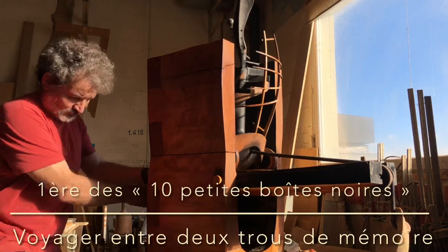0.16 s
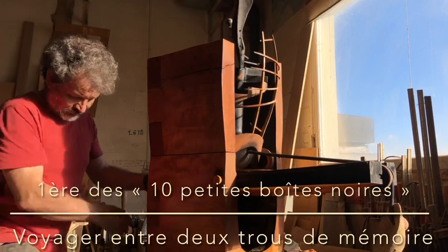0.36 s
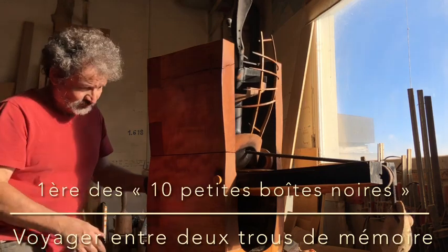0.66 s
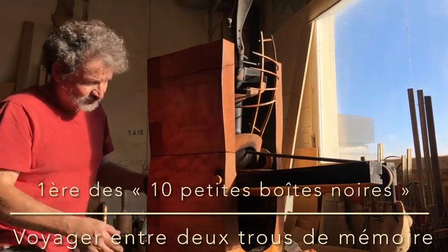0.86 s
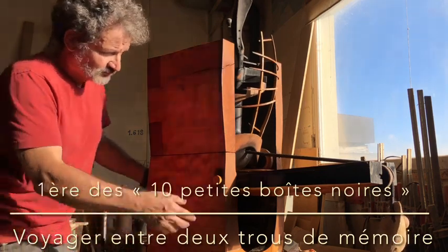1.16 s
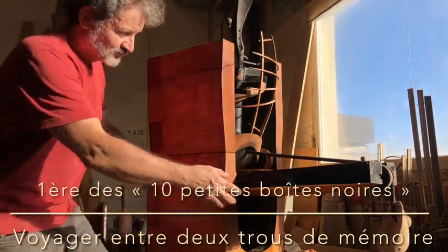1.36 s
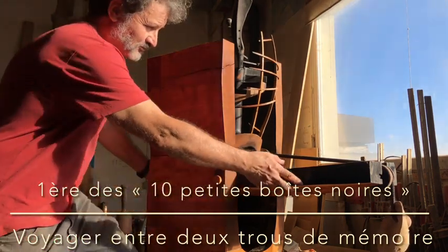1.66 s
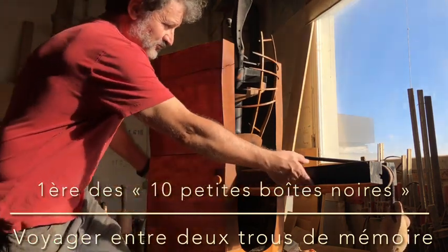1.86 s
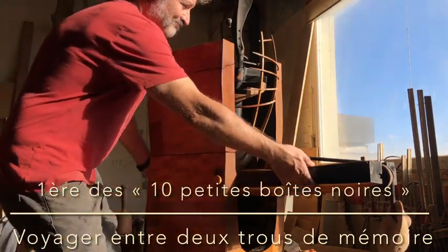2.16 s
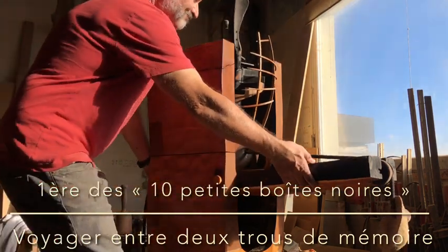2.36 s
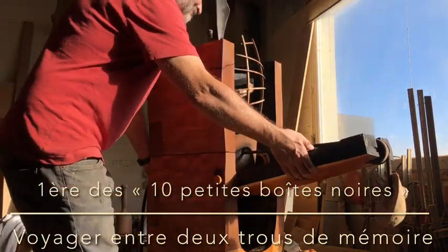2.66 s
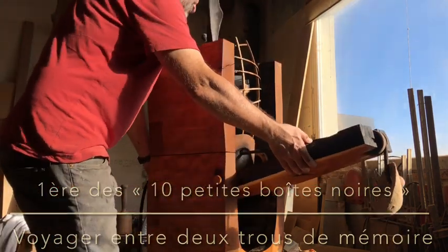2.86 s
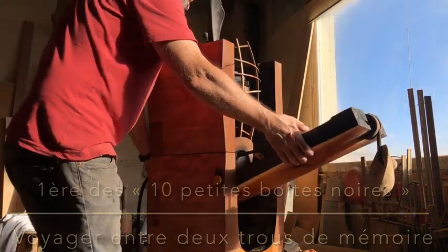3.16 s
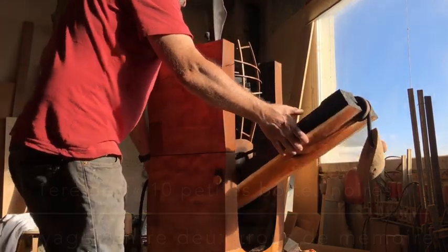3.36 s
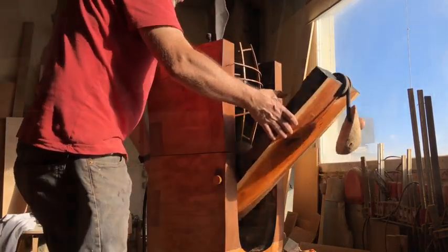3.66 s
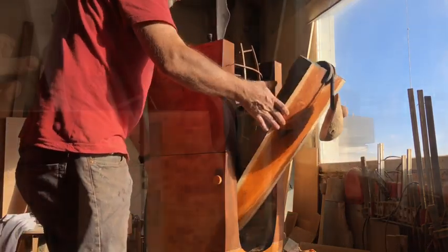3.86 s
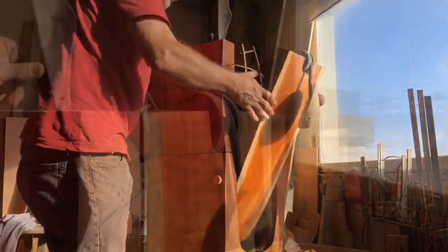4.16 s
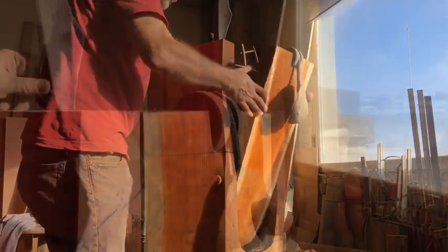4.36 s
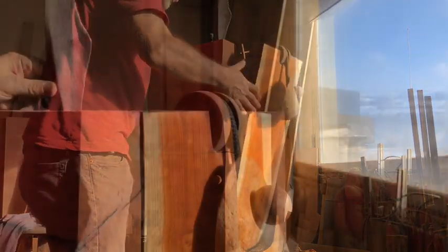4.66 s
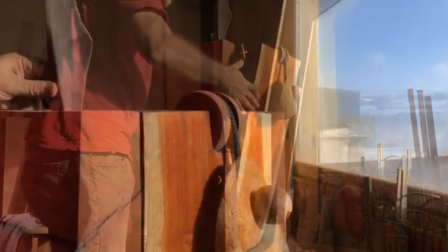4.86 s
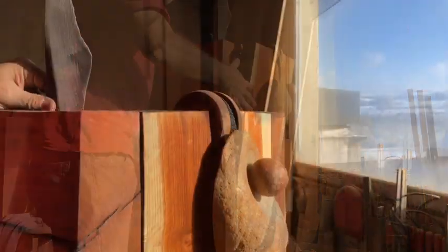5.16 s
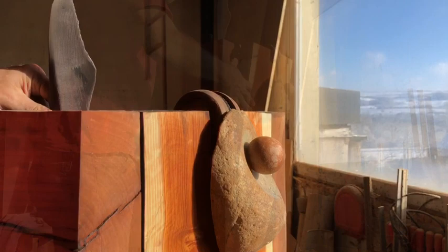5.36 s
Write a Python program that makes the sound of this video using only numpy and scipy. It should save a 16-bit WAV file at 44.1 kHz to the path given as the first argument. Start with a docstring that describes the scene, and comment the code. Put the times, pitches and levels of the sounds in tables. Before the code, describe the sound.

In a small workshop, a wooden drawer scrapes and shuts with a hollow knock. More short slides and knocks follow, then a quick wooden clatter. A hinge creaks and groans briefly as a wooden arm is raised. Near the end come a faint thin squeak, a thud and a slow, juddering rub. Clothes rustle softly, and a microphone a few metres away picks up the room's short echo.

```python
"""A small workshop, one microphone a few metres from a wooden box whose drawers and arm are worked.
Wood scrapes on wood in dense slips and knocks against its stops, setting the parts and bench ringing.
Small catches tick, friction makes the hinge groan as the arm is raised, and near the end come a thin
squeak and a slow, juddering rub. Clothes rustle, and the room rings briefly over a quiet hiss."""
import sys
import numpy as np
from scipy import signal
from scipy.fft import rfft, irfft, next_fast_len
from scipy.io import wavfile
from scipy.ndimage import uniform_filter1d

SR = 44100
rng = np.random.default_rng(int(sys.argv[2]) if len(sys.argv) > 2 else 0)


def file_out(sig):
    """Save sig as 16-bit WAV at sys.argv[1]."""
    # one column per channel
    cols = np.atleast_2d(sig).T
    # limit, then scale
    lim = np.clip(cols, -1, 1)
    pcm = np.round(lim * 32767).astype(np.int16)
    wavfile.write(sys.argv[1], SR, pcm)


N = 243431
TIME = np.arange(N) / SR
RING = TIME[:SR]  # one second holds any ring

# The workshop's echo. Each row: frequency in Hz, seconds to fall 60 dB (t60).
ROOM_T60 = [(80, 1), (210, 0.9), (560, 0.59), (1470, 0.43), (3900, 0.41), (10000, 0.16)]
# Spectra of the room tone and of cloth. Each row: frequency in Hz, relative density in dB.
ROOM_TONE_SPECTRUM = [(15, -66), (25, -6.5), (99, 0.5), (152, -8), (193, 1), (246, -8.5), (399, -27.5),
                      (457, -25.5), (666, -24.5), (782, -22), (1300, -35), (1570, -33), (3930, -36),
                      (15500, -39)]
CLOTH_SPECTRUM = [(410, -39.5), (700, -13), (818, -9.5), (1360, -4), (1580, -5.5), (2130, -8.5),
                  (3450, -9.5), (15500, -17)]
# Movements of the person at the box. Each row: peak in seconds, half length in seconds, swish in dB.
MOVES = [(0.007, 0.1, -72.5), (0.333, 0.274, -69.5), (1.104, 0.315, -69.5), (1.635, .16, -70),
         (2.21, 0.455, -69), (2.953, .25, -79), (3.58, 0.33, -77), (4.32, 0.14, -77), (5.402, 0.44, -74)]
# Resonances of a dry joint and of the hinge. Each row: frequency in Hz, width in Hz, relative dB.
JOINT = [(1117, 160, -0.5), (1343, 96, -4.5), (2140, 200, -13)]
HINGE_CREAK = [(380, 39.4, -14), (589.6, 19.5, -7), (1400, 37, -12.5), (1660, 31, -29), (3180, 36, -20)]
HINGE_DEEP_GROAN = [(192.17, 11, 2.5), (484, 61, -2.5), (556, 37, -8), (1170, 120, -35), (1350, 50, -11.5)]
# Creaks. Each row: start, end, rise and fall in seconds, tone and rasp gains in dB, resonances.
GROANS = [
    (0.181, 0.215, 0.0059, .02, -74, -57, JOINT),
    (2.868, 2.917, .012, 0.012, -52, -54.5, HINGE_CREAK),
    (3.348, 3.384, 0.014, 0.042, -49.5, -56.5, HINGE_DEEP_GROAN),
]
# Sliding strokes. Each row: start, end and rise in seconds, rumble and grit in dB, grit top in Hz.
SLIDES = [ (0.735, 0.761, 0.002, -49, -55, 5180), (0.757, 0.798, 0.0188, -45.5, -61.5, 3600),
          (0.899, 0.998, 0.026, -53, -70.5, 4000), (1.597, 1.696, 0.062, -57, -64, 11500),
          (1.986, 2.037, 0.048, -52.5, -57, 14000), (2.388, 2.407, 0.00266, -40, -50.5, 9100),
          (2.426, 2.463, .0046, -49, -60.5, 10100), (2.968, 2.983, 0.0021, -39, -49, 2720), ]
# Catches and fingernails. Each row: start in seconds, level in dB, centre in Hz.
TICKS = [(0.760, -60.5, 11700), (0.792, -74, 9000), (0.876, -76, 4300), (1.025, -73, 2610),
         (1.043, -70.5, 10500), (1.254, -80, 8700), (2.259, -69, 12500), (2.967, -65, 6000),
         (4.510, -77, 12000), (4.949, -79, 2410)]
# Blows. Each row: start in seconds, part, level in dB, thud centre in Hz, crack in dB against the thud.
KNOCKS = [ (0.791, "drawer", -35.5, 340, -17), (1.718, "panel", -41.5, 510, -9.5),
          (2.047, "runner", -56.5, 336.5, -9), (2.259, "catch", -51.5, 377, -5),
          (2.390, "case", -51.5, 560, -14), (2.419, "case", -45.5, 660, -13),
          (2.434, "case", -41.5, 220, -15.5), (2.453, "case", -37.5, 303, -29.5),
          (2.476, "case", -43, 323, -27), (2.724, "runner", -72.5, 550, -20),
          (2.965, "arm", -46.5, 522, -1), (4.348, "lid", -45.5, 252, -25.5), (4.694, "peg", -59, 280, -12),
          (4.893, "peg", -72, 480, -20), ]
# How each part takes a blow. Each row: ring and bench in dB against the thud, crack top in Hz,
# crack t60 in seconds, echo in dB. The lid's t60 is negative: its crack swells and stops a second late.
CONTACTS = { "drawer": (-0.5, -36.5, 1600, 0.2, .5), "panel": (1, -7.5, 3700, 0.0052, -3),
            "runner": (5, -0.5, 3780, 0.3, -5), "catch": (3.5, -10, 7000, 0.08, -5.5),
            "case": (0.5, -10, 2600, 0.1, -4), "arm": (2, -1, 3200, 0.13, 0),
            "lid": (1.5, -22, 1490, -0.12, -0.5), "peg": (6, -12, 6660, 0.1, -1.5), }
# Modes of each wooden part and of the bench under the box.
# Each row: frequency in Hz, relative level in dB, t60 in seconds (capped at 0.7 when struck).
PART_MODES = { "drawer": [(193, -9.5, 0.32), (240.96, 1.5, 0.27), (267, -0.5, 0.24), (335.9, -2, 0.27),
              (368.5, -1.5, 0.37), (440.8, -9, 0.5), (543, -10.5, .5), (598, -6.5, 0.45), (730, -19, .33),
              (800, -9, 0.22), (900, -25.5, .3), (1160, -17.5, 0.43), (1224, -20.5, 0.51), (1497, -31, .25),
              (1540, -29, 0.37), (1960, -39, 0.33)], "panel": [(145, -33, 0.41), (178.6, -23, 0.66),
              (232, 0.5, 0.74), (263, 1.5, 0.67), (290.6, -5, 0.77), (351, -6.5, 0.44), (457, -13, 0.75),
              (589, -2.5, 0.44), (723.5, -3.5, 0.405), (810, -26, .26), (1050, -26, .16),
              (1157, -16, 0.557), (1500, -37.5, .4), (2350, -27, .4), (2751, -37, .3), (3160, -33, .2),
              (3530, -29.5, 0.21)], "runner": [(168.2, -1.5, 0.72), (222.2, 2.5, 0.35), (268, 5.5, 0.2),
              (454, 1, 0.32), (476, -14, 0.23), (623, -1.5, 0.247), (736, 9.5, 0.097), (1506, -0.5, 0.12),
              (1810, -23, .35), (2320, -16, 0.33), (3520, -6.5, 0.13)], "catch": [(174, -18, 0.41),
              (197.4, -6.5, 0.44), (241, -8, 0.44), (316.9, -1, 0.347), (411, 5.5, 0.19), (580, -4.5, 0.22),
              (980, -10, 0.228), (1500, -13, 0.17), (1838, -15, 0.18), (2095, -2, 0.07), (2160, -13, 0.2),
              (3340, -15, 0.19), (4350, -18, 0.23), (5410, -31.5, 0.21)], "case": [(100.76, 2.5, 0.43),
              (176.15, 0.5, .25), (240.3, 5, 0.72), (262.65, -2, 0.58), (345, -14, 0.44), (450, 7.5, 0.58),
              (484, -3, 0.56), (530, -10, 0.56), (597, 11, 0.24), (594, -7.5, 0.75), (738, -8.5, 0.39),
              (985, -19.5, .45), (1090, -27, 0.44), (1372, -24, 0.33), (1800, -18, 0.48), (2690, -42, .3)],
              "arm": [(201, -4.5, 0.54), (250.5, -2.5, 0.6), (368.2, -9, 0.27), (457, 3.5, 0.38),
              (559, 0, 0.275), (762, -10, 0.64), (943.3, -4, 0.45), (1164, -12, 0.36), (1367, -0.5, 0.258),
              (1798, -18, 0.55), (1910, -5, 0.15), (2240, -18.5, 0.18), (2464, -27, .3), (2710, -3, 0.15),
              (2750, -19, 0.3), (3010, -7, 0.166), (3230, -30, .3), (3780, -4, 0.11), (4150, -26, 0.19),
              (4380, -31, 0.14), (7120, -19, .22), (7060, -24, .16)], "lid": [(141, -13, 0.46),
              (185, 2, 0.596), (202.6, -3, 0.8), (230.6, -3, 0.56), (252, -9, 0.82), (389.1, -7, 0.72),
              (454, -7, 0.43), (520.5, -6, 0.448), (920, -24, 0.36), (1125, -25, .3)],
              "peg": [(136, 4.5, 0.28), (215, -9, 0.23), (476, -1, 0.249), (534, -9, 0.33),
              (559.6, -5.5, 0.224), (1360, -23.5, 0.224), (3060, -9, 0.048), (6600, -21.5, .08)], }
BENCH_MODES = [(50.4, -9.5, 0.98), (60.34, -4, 1), (78, -3, 1), (102.6, -10.5, 1), (138.2, 2, 0.6),
               (170.3, 4, 0.73)]
# The squeak's path. Each row: time in seconds, pitch in Hz.
SQUEAK_PITCH = [(4.19, 10120), (4.258, 14750), (4.30, 13150), (4.375, 12450), (4.415, 12650), (4.49, 10800)]
# Slow rubs of wood on wood. Each row: start and end in seconds, level in dB.
RUBS = [(4.204, 4.338, -62), (5.232, 5.52, -59.5)]
# The rubbing wood sticks and jerks free. Each row: peak in seconds, level in dB.
JERKS = [(5.032, -62.5), (5.112, -53), (5.155, -54), (5.208, -52), (5.42, -66), (5.465, -58.5)]
# Resonances of the rubbed box and of its grain. Each row: frequency in Hz, width in Hz, relative dB.
BOX_HUM = [(147.4, 24.55, 2), (189.2, 46.05, -8), (446, 41.3, -5), (490, 38.4, -15)]
GRAIN_HISS = [(312, 370, 3), (859, 89, -5.5), (1390, 530, -10.5), (1930, 470, -16), (3120, 560, -18.5),
              (3770, 320, -10.5)]


def amp(db):
    """Decibels to gain."""
    return 10 ** (np.asarray(db) / 20)


def unit(x):
    """Scale to rms 1."""
    return x / np.sqrt(np.mean(x ** 2))


def burst(x):
    """Scale a transient to the energy of 50 ms at rms 1."""
    return x / np.sqrt(np.sum(x ** 2) / (SR / 20))


def fade(t60):
    """Exponential decay, 60 dB down after t60 seconds; a negative t60 grows."""
    return np.exp(-np.log(1000) * RING / t60)


def swell(length, rise, fall):
    """A push that builds up, holds until length, and dies away; all in seconds."""
    return np.minimum(RING / rise, 1) * np.exp(-np.maximum(RING - length, 0) * 2 / fall)


def hump(s, half_s):
    """A smooth rise and fall around time s."""
    return np.exp(-((TIME - s) / half_s) ** 2)


def add(track, s, x):
    """Mix a sound into the track at time s."""
    i = int(s * SR)
    track[i:i + len(x)] += x[:N - i]


def on_log(hz, points):
    """Read a (Hz, value) table on a log-frequency axis."""
    f, value = np.transpose(points)
    return np.interp(np.log(hz), np.log(f), value)


def shape(x, gain):
    """Filter by a gain that is a function of frequency; causal, so attacks stay sharp."""
    size = next_fast_len(len(x) // 2 + 2048) * 2
    hz = np.maximum(np.arange(size // 2 + 1) * SR / size, 1)
    cepstrum = irfft(np.log(gain(hz) + 1e-6))
    cepstrum[1:size // 2] *= 2  # fold to minimum phase
    cepstrum[size // 2 + 1:] = 0
    return irfft(rfft(x, size) * np.exp(rfft(cepstrum)))[:len(x)]


def band(x, low_hz, top_hz, rise=2, fall=2):
    """Pass a band; rise and fall are the slopes of its edges in poles."""
    return shape(x, lambda f: ((1 + (low_hz / f) ** (2 * rise)) * (1 + (f / top_hz) ** (2 * fall))) ** -.5)


def edges(centre_hz, octaves):
    """Low and top edge of a band."""
    return centre_hz / 2 ** (octaves / 2), centre_hz * 2 ** (octaves / 2)


def walk(rate, size):
    """Smooth random wander of rms near 1, with rate turns a second."""
    step = int(SR / rate)
    stairs = np.repeat(rng.standard_normal(size // step + 2), step)
    return unit(uniform_filter1d(stairs, step))[:size]


def grains(size, spread):
    """Dense slips of uneven strength."""
    return unit(rng.standard_normal(size) * np.exp(spread * walk(900, size)))


def resonate(x, resonances, damping):
    """Pass through resonances; damping widens each in proportion to its frequency."""
    return shape(x, lambda f: sum(amp(db) / (1 + (2 * (f - hz) / (width + damping * hz)) ** 2)
                                  for hz, width, db in resonances))


def sing(resonances, size, waver):
    """Resonances kept going by friction; each wavers in proportion to its width."""
    tone = np.zeros(size)
    for hz, width, db in resonances:
        pitch = hz + waver * width * walk(120, size)
        tone += amp(db) * np.sin(2 * np.pi * np.cumsum(pitch) / SR)
    return unit(tone)


def modes(table):
    """Struck modes ring down; neighbours start in opposite directions."""
    ring = sum((-1) ** k * amp(db) * np.sin(2 * np.pi * hz * RING) * fade(min(t60, .7))
               for k, (hz, db, t60) in enumerate(table))
    return burst(ring * (1 - np.exp(-RING / 0.0048)))


def room():
    """Diffuse workshop echo from one spot, of unit energy; the bass lasts longest."""
    centres = 60 * 2. ** np.arange(9)
    hz = np.maximum(np.arange(SR // 2 + 1), 1)
    noise = rfft(rng.standard_normal(SR))
    tail = np.zeros(SR)
    for centre, share in zip(centres, np.eye(len(centres))):
        octave = irfft(noise * np.interp(np.log(hz), np.log(centres), share))
        tail += octave * fade(on_log(centre, ROOM_T60))
    tail *= 1 - np.exp(-(RING / 0.0064) ** 2)  # the first reflections need a few ms
    return tail / np.sqrt(np.sum(tail ** 2))


def in_room(x, room_db):
    """What reaches the microphone: the direct sound, and its echo at room_db against it."""
    echo = signal.fftconvolve(x, room())[:len(x)]
    return x + amp(room_db) * unit(echo) * np.std(x)


def room_tone():
    """The workshop's low rumble and even hiss."""
    noise = shape(rng.standard_normal(N), lambda f: amp(on_log(f, ROOM_TONE_SPECTRUM)))
    return amp(-67.5) * unit(noise)


def handling(cloth_rest_db=-78, bump_rest_db=-70):
    """Cloth swishes and hands bump softly on the box, both with the speed of each movement."""
    motion = sum(amp(db) * hump(s, half_s) for s, half_s, db in MOVES)
    swish = unit(shape(grains(N, spread=0.071), lambda f: amp(on_log(f, CLOTH_SPECTRUM))))
    unevenness = amp(1.8 * walk(18, N))
    bump = unit(band(rng.standard_normal(N), 140, 477, rise=3.1, fall=2.153)) * unevenness
    swish_level = np.hypot(motion, amp(cloth_rest_db))
    bump_level = np.hypot(amp(3) * motion, amp(bump_rest_db))
    return swish * swish_level + bump * bump_level


def groans():
    """A dry joint or hinge breaks loose with a rasp, then friction keeps its low resonances singing."""
    out = np.zeros(N)
    for start, end, rise, fall, tone_db, rasp_db, resonances in GROANS:
        flutter = unit(amp(2.5 * walk(260, SR)))
        tone = band(sing(resonances, SR, waver=0.436) * flutter, 60, 810, fall=2.3)
        slips = resonate(grains(SR, spread=0.35), resonances, damping=0.32)
        rasp = unit(band(slips, 850, 4000, rise=0.96)) * fade(0.19)
        creak = swell(end - start, rise, fall) * (amp(tone_db) * tone + amp(rasp_db) * rasp)
        add(out, start, in_room(creak, room_db=-5.5))
    return out


def slides():
    """Wood runs on wood: the grain catches in dense slips, and the boards rumble along."""
    out = np.zeros(N)
    for start, end, rise, rumble_db, grit_db, grit_hz in SLIDES:
        slips = grains(SR, spread=0.36)
        rumble = unit(band(slips, 127, 554, rise=4.7, fall=3.8))
        grit = band(slips, 637, grit_hz)
        grit = unit(band(grit, 140, 1500, fall=0.46))  # a gentle tilt softens the treble
        push = swell(end - start, rise, fall=0.023)
        scrape = push * (amp(rumble_db) * rumble + amp(grit_db) * grit)
        add(out, start, in_room(scrape, room_db=-2.0))
    return out


def ticks():
    """Tiny hard contacts, over in a few milliseconds."""
    out = np.zeros(N)
    for s, db, hz in TICKS:
        snap = rng.standard_normal(SR) * fade(0.011)
        tick = band(snap, *edges(hz, octaves=0.97), rise=6.3, fall=9.3)
        add(out, s, amp(db) * burst(in_room(tick, room_db=-11.5)))
    return out


def knocks(thud_cycles=36.75):
    """A blow cracks at the contact, thuds in the boards, rings the part and booms in the bench."""
    out = np.zeros(N)
    for s, part, db, thud_hz, crack_db in KNOCKS:
        ring_db, bench_db, crack_hz, crack_t60, room_db = CONTACTS[part]
        thud = rng.standard_normal(SR) * fade(thud_cycles / thud_hz)
        thud = band(thud, *edges(thud_hz, octaves=2.036), rise=2.76, fall=4.77)
        crack = band(rng.standard_normal(SR) * fade(crack_t60), 656, crack_hz, rise=6.1, fall=3.6)
        ring = amp(ring_db) * modes(PART_MODES[part]) + amp(bench_db) * modes(BENCH_MODES)
        thud = burst(in_room(thud, room_db))
        crack = burst(in_room(crack, room_db - 3))  # drier than the thud
        add(out, s, amp(db) * (thud + amp(crack_db) * crack + ring))
    return out


def squeak(edge_s=0.03, db_per_octave=32):
    """A very high, thin whistle of dry surfaces, louder as its pitch rises."""
    s, hz = np.transpose(SQUEAK_PITCH)
    pitch = np.interp(TIME, s, hz) * (1 + 0.0043 * walk(500, N))
    contact = np.clip(np.minimum(TIME - s[0], s[-1] - TIME) / edge_s + .5, 0, 1)
    db = -78.5 + db_per_octave * np.log2(pitch / 13060)
    whistle = unit(np.sin(2 * np.pi * np.cumsum(pitch) / SR))
    return whistle * amp(db) * contact


def rub():
    """A slow, juddering rub hums in the hollow box, with a soft dry hiss of the grain."""
    pressure = sum(amp(db) * hump(s, half_s=0.018) for s, db in JERKS)
    for start, end, db in RUBS:
        add(pressure, start, amp(db) * swell(end - start, rise=0.048, fall=0.047))
    hum = sing(BOX_HUM, N, waver=0.607)
    slips = resonate(grains(N, spread=0.16), GRAIN_HISS, damping=.02)
    hiss = unit(band(slips, 140, 9000))
    smooth_pressure = uniform_filter1d(pressure, SR // 5)
    return hum * pressure + amp(-7.5) * hiss * smooth_pressure


def scene():
    """The box, the person and the room at one microphone, a few metres off."""
    box = knocks() + ticks() + slides() + groans() + rub() + squeak()
    return (box + handling() + room_tone())[None]


def record(dry, top_hz=15900):
    """The recorder cuts the top steeply."""
    return signal.sosfilt(signal.ellip(10, .2, 70, top_hz, fs=SR, output="sos"), dry)


dry = scene()
out = record(dry)
file_out(out)
```